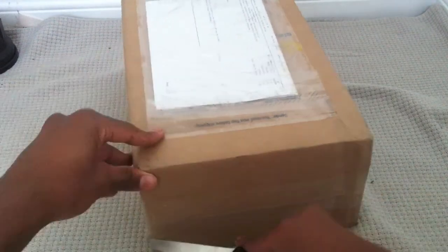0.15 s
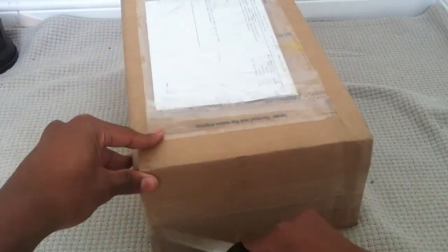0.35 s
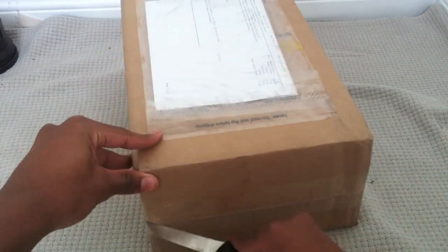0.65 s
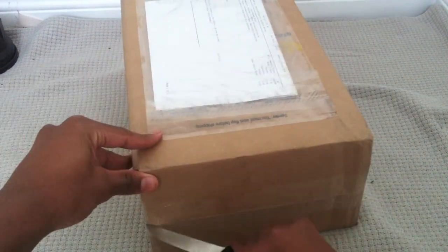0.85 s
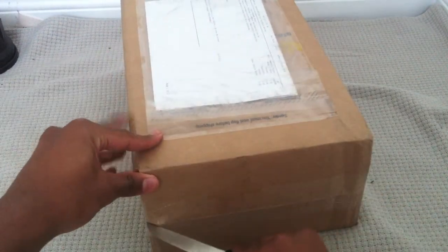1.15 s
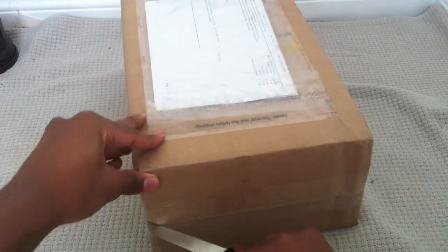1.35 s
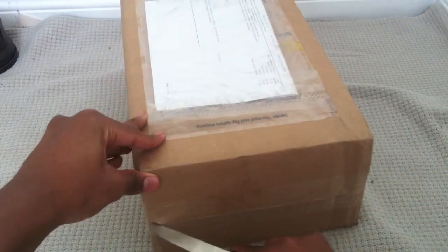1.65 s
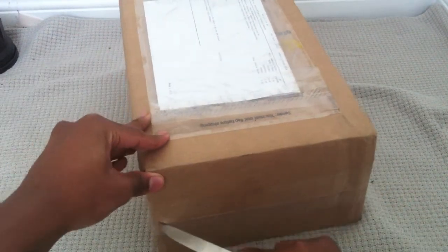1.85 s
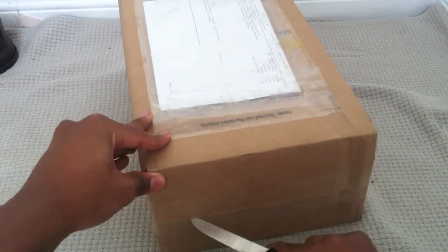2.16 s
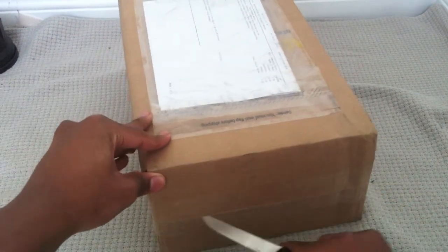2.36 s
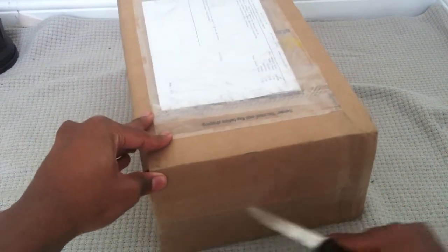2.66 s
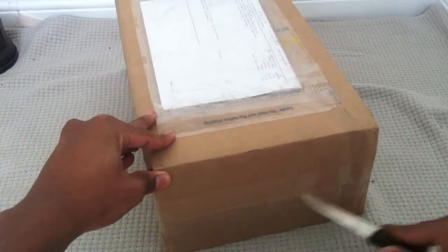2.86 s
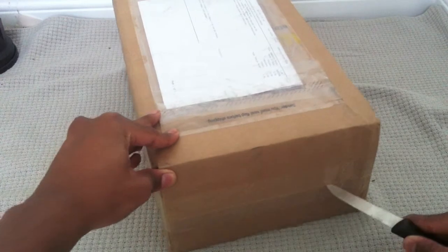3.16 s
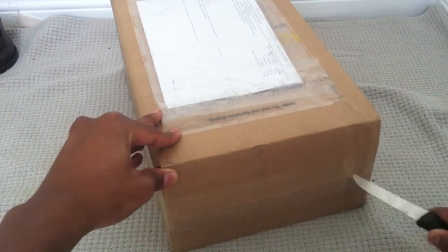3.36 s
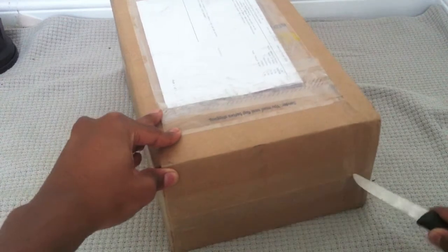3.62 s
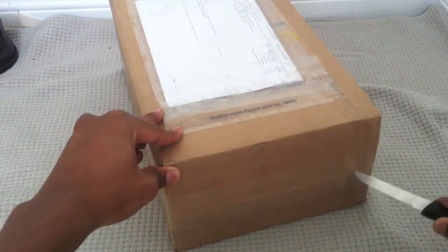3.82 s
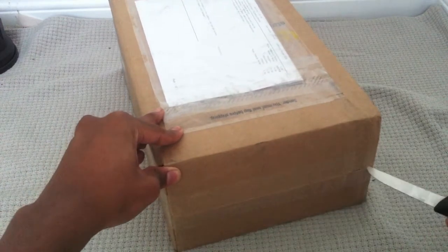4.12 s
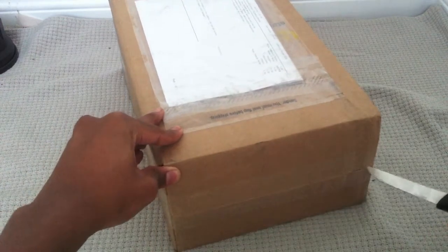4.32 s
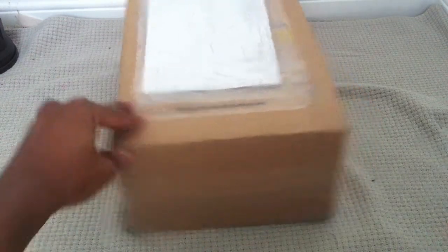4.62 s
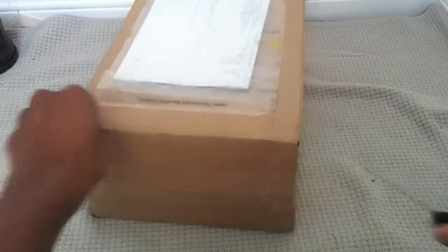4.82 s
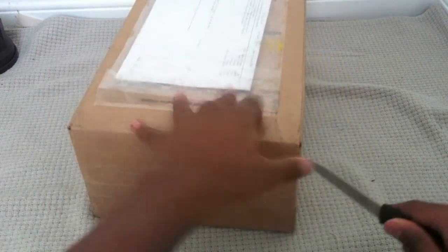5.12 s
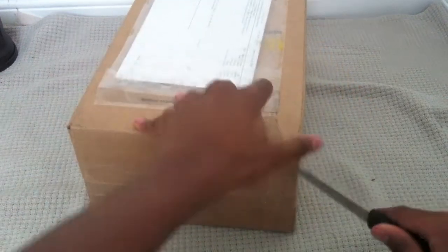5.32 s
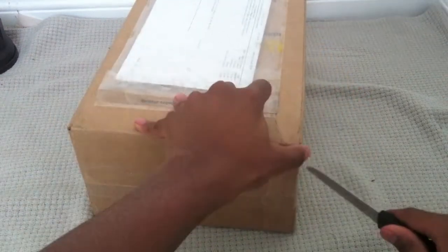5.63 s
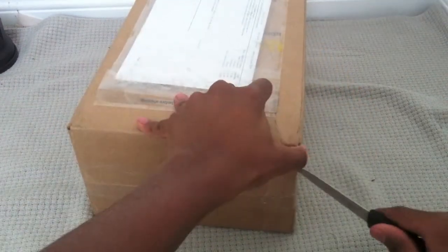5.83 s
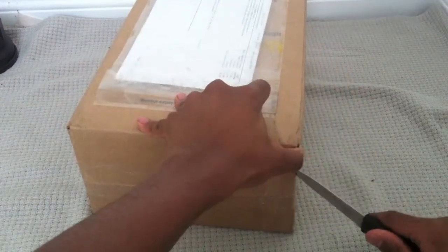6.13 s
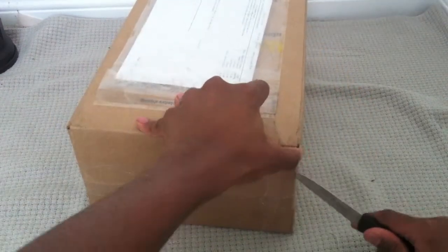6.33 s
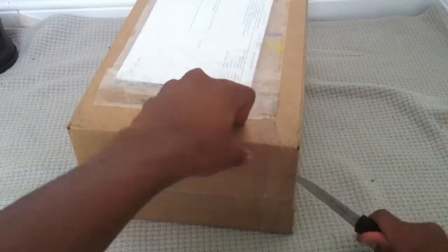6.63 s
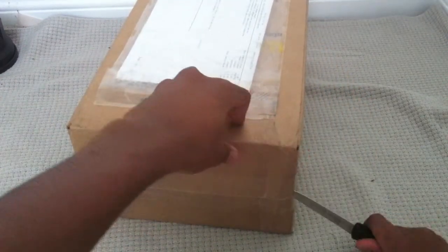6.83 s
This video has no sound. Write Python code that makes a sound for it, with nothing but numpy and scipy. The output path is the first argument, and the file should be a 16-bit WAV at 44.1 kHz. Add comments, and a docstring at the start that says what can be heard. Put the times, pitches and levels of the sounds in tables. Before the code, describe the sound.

Close and fairly dry, over faint room tone: soft skin rubs and taps, a sudden double thump, then a long gritty slit through tape that drums on the hollow box. Shorter rips follow, a steel flick with a squeak, a box dragged on a blanket, a springy blade twang, quiet handling, and a loud crunching stab with fluttering lid.

```python
"""A kitchen knife slits the packing tape of a cardboard box that stands on a blanket in a small room.
Blade: random grains rasp through tape and fibres; it catches, snaps free, squeaks, and flicks set steel modes ringing.
Box: each jolt makes a wall thump as damped swings; the panels ring as a bank of modes.
Hands: filtered noise brushes and turns the box, fingers tap, and judder on the lid as the tip stabs in."""
import sys
import numpy as np
from scipy import signal
from scipy.fft import rfft, irfft
from scipy.io import wavfile

SR = 44100
rng = np.random.default_rng(int(sys.argv[2]) if len(sys.argv) > 2 else 0)


def digitize_waveform(pressure):
    """Quantize a signal to 16-bit integers and store it at the path in sys.argv[1].

    Rows of a 2-D input are taken as channels; values are limited to [-1, 1].
    """
    field = np.atleast_2d(pressure).T
    bounded = np.clip(field, -1, 1)
    quanta = np.round(bounded * 32767).astype(np.int16)
    wavfile.write(sys.argv[1], SR, quanta)


N = 307818

# tape snapping, and ticks at any contact: f/Hz, density/dB
SNAP_SPECTRUM = [(1500, -28), (3000, -5.5), (4000, -8), (5700, -2.5), (8300, -9), (10500, -5), (12100, 4.5),
                 (14200, -6.5), (16000, -17.5)]
# board fibres giving way: f/Hz, density/dB
CRUNCH_SPECTRUM = [(40, -36.5), (120, 3), (350, 6.5), (620, 1.5), (850, 2), (1150, 2), (1550, -5),
                   (2000, -4), (2800, -6), (4000, -14.5), (9000, -48.5)]
# light friction, also the tick of the flicked blade: f/Hz, density/dB
RUB_SPECTRUM = [(100, -15), (500, 4), (1100, -3.5), (2200, -2.5), (3000, -5), (4200, -6), (5600, -2.5),
                (8000, -17), (16000, -23)]


def from_db(db):
    """Level to amplitude."""
    return 10 ** (np.asarray(db) / 20)


def rms_one(x):
    """Scale to rms 1."""
    return x / np.sqrt(np.mean(x ** 2) + 1e-20)


def seconds(size):
    """Time axis."""
    return np.arange(size) / SR


def add(track, s, sound):
    """Mix a sound into the track from time s on."""
    start = max(0, round(s * SR))
    track[start:start + len(sound)] += sound[:max(0, N - start)]


def decay(t, t60):
    """Exponential fall of 60 dB in t60."""
    return np.exp(-np.log(1000) * t / t60)


def coloured(x, spectrum):
    """Causal (minimum-phase) filter with this spectrum; white noise keeps its power."""
    size = 4096
    hz, db = np.transpose(spectrum)
    grid = np.maximum(np.arange(size // 2 + 1) * SR / size, 1)
    gain = rms_one(from_db(np.interp(np.log(grid), np.log(hz), db)))
    cepstrum = irfft(np.log(gain))
    cepstrum[1:size // 2] *= 2   # fold onto positive time
    cepstrum[size // 2 + 1:] = 0
    impulse = irfft(np.exp(rfft(cepstrum)))
    return signal.oaconvolve(x, impulse)[:len(x)]


def drift(rate):
    """Random wander about 0: unit-normal knots, rate per second, joined by lines."""
    knots = rng.standard_normal(N // 20)
    return np.interp(seconds(N) * rate, np.arange(len(knots)), knots)


def grains(per_s, spread_db):
    """Clicks of random time and sign, sizes spread exponentially in dB; rms 1."""
    sizes = from_db(spread_db * np.minimum(rng.exponential(1, N), 4))
    signs = rng.choice([-1, 1], N)
    return rms_one(sizes * signs * (rng.random(N) < per_s / SR))


def ticks(per_s, scatter_db, fall_s):
    """Short noise crackles at random moments; rms 1."""
    sizes = (rng.random(N) < per_s / SR) * from_db(scatter_db * rng.standard_normal(N))
    dying = signal.lfilter([1], [1, -np.exp(-1 / (fall_s * SR))], sizes + 1e-18)
    return rms_one(dying * rng.standard_normal(N))


def ring(force, hz, t60):
    """Resonator: a unit click sets a decaying sine of height 1 ringing."""
    r, w = np.exp(-np.log(1000) / (t60 * SR)), 2 * np.pi * hz / SR
    return signal.lfilter([0, np.sin(w)], [1, -2 * r * np.cos(w), r * r], force + 1e-18)


def ring_modes(modes):
    """Click response of a bank of modes."""
    click = signal.unit_impulse(SR // 4)
    return sum(from_db(db) * ring(click, hz, t60) for hz, db, t60 in modes)


def bursts(times, levels_db, rise_s, fall_s):
    """Envelope of short bursts, summed in power."""
    power, t = np.zeros(N), seconds(SR // 8)
    shape = (1 - np.exp(-t / rise_s)) * np.exp(-t / fall_s)
    for s, db in zip(times, levels_db):
        add(power, s, (from_db(db) * shape / shape.max()) ** 2)
    return np.sqrt(power)


def level(s, db):
    """A level curve as a gain in time, silent outside its points."""
    return from_db(np.interp(seconds(N), s, db, left=-200, right=-200))


def strokes(rows):
    """Every stroke swells to a peak and fades; one gain in time for each dB column."""
    swell_db, curve = 19, 1.86   # change over one rise or fall; 1 = pointed, 2 = rounded
    t, power = seconds(N), 0
    for peak_s, rise_s, fall_s, *levels_db in rows:
        away = np.minimum(np.maximum((peak_s - t) / rise_s, (t - peak_s) / fall_s), 4)
        shape = from_db(-swell_db * np.abs(away) ** curve)
        power = power + np.outer(from_db(levels_db), shape) ** 2
    return np.sqrt(power)


def room_tone():
    """Steady coloured noise of the room."""
    # f/Hz, density/dB
    tone_spectrum = [(15, -58), (25, -29), (76, -16), (145, -3), (335, -4), (373, -4), (427, -12.5),
                     (545, -12.5), (591, -14), (659, -16.5), (1790, -19.5), (2220, -20), (16000, -24)]
    return from_db(-63) * coloured(rng.standard_normal(N), tone_spectrum)


def sliding(rub_db, hiss_db, drag_db):
    """Fine friction of skin and blade on cardboard and of the box on the blanket."""
    # skin and blade over the box: peak t/s, rise/s, fall/s, dull rub level/dB, bright hiss level/dB (before gains)
    brush_rows = [(0.01, 0.11, 0.24, -56.5, -58), (1.195, 0.059, 0.073, -58, -53),
                  (1.42, .16, 0.11, -62.5, -62.5), (1.87, 0.39, 0.73, -64, -68.5),
                  (3.24, 0.18, .15, -61, -58), (3.6, 0.29, 0.2, -66, -58.5), (4.33, 0.13, 0.077, -71, -94),
                  (4.81, 0.41, 0.097, -52, -54), (4.885, 0.013, 0.046, -56, -52.5),
                  (5.03, 0.094, 0.055, -70.5, -50), (5.27, 0.083, 0.15, -61.5, -58.5),
                  (5.44, 0.049, 0.088, -61.5, -65.5), (6.14, 0.068, 0.068, -62.5, -70),
                  (6.29, 0.073, 0.051, -59.5, -65), (6.59, 0.16, 0.077, -62.5, -63),
                  (6.88, 0.091, 0.17, -62.5, -62)]
    # box shifting on the blanket: peak t/s, rise/s, fall/s, level/dB (before gain)
    drag_rows = [(0.01, .05, 0.19, -49), (4.8, 0.4, 0.22, -53)]
    # soft hiss of skin: f/Hz, density/dB
    hiss_spectrum = [(3000, -14.5), (7500, -7.5), (9500, -2), (12500, 1.5), (14500, -3.5), (16000, -9)]
    # box on cloth: f/Hz, density/dB
    drag_spectrum = [(29, -91), (50, -52), (93, -3), (234, 14.5), (339, 7), (462, -11), (539, -26),
                     (2000, -4), (2600, -63), (4400, -120)]
    rub, hiss = strokes(brush_rows)
    drag, = strokes(drag_rows)
    grain = grains(per_s=16000, spread_db=3.0) * from_db(0.52 * drift(rate=170))
    # skin crossing tape edges and creases
    grain += from_db(-7) * ticks(per_s=60, scatter_db=2, fall_s=0.0022)
    skin = from_db(rub_db) * coloured(rub * grain, RUB_SPECTRUM)
    skin += from_db(hiss_db) * coloured(hiss * rng.standard_normal(N), hiss_spectrum)
    cloth = coloured(drag * grains(per_s=2700, spread_db=-1.0), drag_spectrum)
    return skin + from_db(drag_db) * cloth


def judder(jitter, uneven_db, scuff):
    """Stick-slip: soft, nearly regular slips of fingers push on the lid at a wandering rate."""
    # t/s, slip rate/Hz (before jitter), level/dB
    judder_rows = [(6.63, 186, -70), (6.661, 190, -44), (6.681, 220, -44), (6.719, 210, -46),
                   (6.781, 216, -45), (6.9, 191, -45.5), (6.98, 206, -46)]
    # push of a finger: f/Hz, density/dB
    finger_spectrum = [(60, -25), (120, -3.5), (210, 2.5), (420, -3.5), (650, -8.5), (800, -18),
                       (1300, -20), (1600, -35), (4000, -40.5)]
    s, per_s, db = np.transpose(judder_rows)
    rate = np.interp(seconds(N), s, per_s) * np.exp(jitter * drift(rate=150))
    slips = np.diff(np.floor(np.cumsum(rate) / SR), prepend=0)
    slips = slips * from_db(uneven_db * drift(rate=400))
    force = rms_one(slips - slips.mean()) + scuff * rng.standard_normal(N)
    return level(s, db) * rms_one(coloured(force, finger_spectrum))


def squeaks(t60):
    """Brief rough whistles of steel gripping tape: noise through a resonator."""
    # t/s, length/s, f/Hz, level/dB
    squeak_rows = [(0.824, 0.024, 4130, -60), (4.538, 0.057, 4720, -43.5), (4.544, 0.033, 3960, -51),
                   (4.542, 0.067, 2450, -50)]
    out = np.zeros(N)
    for s, length, hz, db in squeak_rows:
        tone = rms_one(ring(rng.standard_normal(SR // 8), hz, t60))
        swell = np.hanning(round(length * SR))
        add(out, s, from_db(db) * swell * tone[:len(swell)])
    return out


def twangs(tick_fall_s, swing_delay_s):
    """The blade flicked off an edge ticks, rings and then swings as a whole."""
    # held in the board it cannot swing: t/s, swing level/dB, ring level/dB, tick level/dB
    twang_rows = [(4.443, -70, -37, -59), (4.454, -67, -32.5, -35), (5.324, -28, -32.5, -40.5),
                  (5.382, -41.5, -43, -69), (6.801, -48, -32.5, -53)]
    # steel ringing: f/Hz, level/dB, t60/s
    blade_modes = [(637, -9, 0.017), (1140, -16, 0.054), (1137, 1, 0.028), (1205, -4, 0.054),
                   (1520, -18, 0.034), (1750, -30, 0.018), (2520, -23, 0.049), (3180, -16, 0.02),
                   (4620, -18, 0.032)]
    # whole blade swinging: f/Hz, level/dB, t60/s
    swing_modes = [(288.8, -5.5, 0.23), (320.6, -1, 0.11)]
    s, swing_db, ring_db, tick_db = np.transpose(twang_rows)
    steel, swing = ring_modes(blade_modes), ring_modes(swing_modes)
    tick = bursts(s, tick_db, rise_s=0.00079, fall_s=tick_fall_s) * rng.standard_normal(N)
    out = coloured(tick, RUB_SPECTRUM)
    for at, low_db, high_db in zip(s, swing_db, ring_db):
        add(out, at, from_db(high_db) * steel)
        add(out, at + swing_delay_s, from_db(low_db) * swing)
    # a narrow blade radiates almost no bass
    return signal.sosfilt(signal.butter(2, 200, "high", fs=SR, output="sos"), out)


def jolts():
    """Catches, stabs and taps each give a snap, a crunch and a thump: t/s, then three levels/dB before gains."""
    # blade catches in the tape and snaps free: t/s, snap level/dB, thump level/dB
    catch_rows = [(2.045, -39.5, -36.5), (2.07, -37, -35), (2.089, -32.5, -14.5), (2.12, -29.5, -12.5),
                  (2.403, -34.5, -31), (2.483, -33, -25), (2.578, -45, -34.5), (2.646, -32, -29.5),
                  (2.693, -33, -22), (2.734, -39, -28), (2.768, -26.5, -18.5), (2.801, -26, -14),
                  (2.835, -24.5, -23.5), (2.869, -32, -23.5), (2.899, -27, -20), (2.929, -32, -19),
                  (2.964, -31, -21.5), (3.001, -33.5, -19.5), (3.054, -37.5, -27), (3.307, -37, -33.5),
                  (3.358, -38, -28.5), (3.384, -26.5, -28), (3.412, -40, -28), (3.93, -43, -37.5),
                  (4.004, -39.5, -31.5), (4.032, -36, -38), (4.433, -38.5, -29.5), (4.813, -44.5, -49),
                  (6.796, -22, -24.5)]
    # tip stabs into the board: t/s, crunch level/dB, thump level/dB
    stab_rows = [(0.914, -44, -40.5), (2.116, -31.5, -28), (4.456, -35, -26.5), (5.221, -44, -40),
                 (5.618, -32.5, -41.5), (6.199, -49.5, -48), (6.271, -40, -42), (6.79, -24.5, -31)]
    # fingers land on the box: t/s, thump level/dB
    tap_rows = [(0.003, -36.5), (0.922, -41.5), (1.144, -32.5), (1.185, -39.5), (1.294, -43), (1.312, -44),
                (1.369, -44), (1.594, -46), (1.72, -44.5), (4.629, -37), (5.894, -42.5), (6.12, -50),
                (6.15, -48), (6.368, -51)]
    catches = [(s, db, db - 4.5, thump_db) for s, db, thump_db in catch_rows]
    stabs = [(s, db - 2.5, db, thump_db) for s, db, thump_db in stab_rows]
    taps = [(s, db - 15, db - 15, db) for s, db in tap_rows]
    return np.transpose(catches + stabs + taps)


def thumps(gain_db, push_s, wall_t60, vary_db):
    """The released wall springs back in a few damped swings; each spot has its own pitch and overtones."""
    # multiple of the lowest mode, mean level/dB
    wall_overtones = [(1.6, -11.5), (2.35, -16.5), (3.2, -22.5)]
    wall_hz, scatter = 216.8, 0.068   # median lowest mode; log-spread from spot to spot
    out, t = np.zeros(N), seconds(SR // 4)
    swell = (1 - np.exp(-(t / push_s) ** 2)) * decay(t, wall_t60)
    multiple, overtone_db = np.transpose(wall_overtones)
    times, _, _, levels_db = jolts()
    for s, db in zip(times, levels_db):
        phase = 2 * np.pi * wall_hz * np.exp(scatter * rng.standard_normal()) * t
        gains = from_db(overtone_db + vary_db * rng.standard_normal(len(multiple)))
        wall = np.sin(phase) + gains @ np.sin(np.outer(multiple, phase))
        add(out, s, from_db(db + gain_db) * swell / swell.max() * wall)
    return out


def panels(force):
    """Modal ring of the hollow box; white noise keeps its power."""
    # other panels and the air inside: f/Hz, level/dB, t60/s
    box_modes = [(152, -5, 0.097), (201, 4.5, 0.065), (238, -1.5, 0.096), (335.2, 0.5, 0.074),
                 (393.5, -5.5, 0.073), (499, -7.5, 0.077), (599, -6.5, 0.068), (671.4, -12, 0.12),
                 (714, -9, 0.05), (798, -10.5, 0.071), (888, 1, 0.021), (1104, -23, 0.053)]
    answer = ring_modes(box_modes)
    answer *= 1 - np.exp(-seconds(len(answer)) / 0.0056)   # bending waves take a moment to spread
    return signal.oaconvolve(force, answer / np.linalg.norm(answer))[:N]


def breaking(snap_gain_db, crunch_gain_db, panel_db):
    """Each jolt gives a snap and a crunch of grains; the crunch shakes the panels."""
    s, snap_db, crunch_db, _ = jolts()
    snap = bursts(s, snap_db + snap_gain_db, rise_s=0.0077, fall_s=0.0035)
    snap *= grains(per_s=10000, spread_db=4.5)
    crunch = bursts(s, crunch_db + crunch_gain_db, rise_s=0.0012, fall_s=0.0063)
    crunch *= grains(per_s=8000, spread_db=0.5)
    cracks = coloured(snap, SNAP_SPECTRUM) + coloured(crunch, CRUNCH_SPECTRUM)
    return cracks + from_db(panel_db) * panels(crunch)


def travelling(x, patchy_db):
    """As the contact moves along the seam, each range of pitch radiates now more, now less."""
    out, rest = 0, x
    for hz in np.geomspace(450, 11000, 7):
        low = signal.sosfiltfilt(signal.butter(2, hz, fs=SR, output="sos"), rest)
        out = out + low * from_db(patchy_db * drift(rate=37))
        rest = rest - low
    return out + rest


def pushing():
    """How hard the edge works, as gains in time: on fibres and on tape."""
    # long slit along the seam: t/s, rasp level/dB, tape sizzle level/dB (before gains)
    slit_curve = [(2.21, -92, -82), (2.30, -59.5, -73), (2.42, -46.5, -55.5), (2.62, -46, -45.5),
                  (2.82, -36.5, -44.5), (3.02, -42.5, -47), (3.12, -49, -55.5), (3.18, -71, -68)]
    # short pushes: peak t/s, rise/s, fall/s, rasp level/dB, tape sizzle level/dB (before gains)
    jab_rows = [(2.086, 0.055, 0.046, -37.5, -51), (3.38, 0.091, 0.077, -37.5, -41),
                (3.935, 0.031, 0.058, -47.5, -46), (4.015, 0.07, 0.062, -45.5, -49),
                (4.445, 0.018, 0.024, -36.5, -43.5), (5.635, 0.072, 0.054, -51.5, -73),
                (6.802, 0.016, 0.048, -35, -49)]
    s, *levels_db = np.transpose(slit_curve)
    return strokes(jab_rows) + [level(s, db) for db in levels_db]


def cutting(rasp_db, sizzle_db, drum_db, uneven_db, grip_db):
    """The moving edge breaks fibres and tape in uneven clumps and snags; the fibres also drum on the box."""
    # edge in fibres: f/Hz, density/dB
    rasp_spectrum = [(60, -45), (150, -10), (380, -6.5), (650, -11.5), (1150, 0.5), (1550, -7), (2000, -5),
                     (3000, -4.5), (4000, -12), (5700, -5), (8300, -18), (16000, -11)]
    # tape crackle: f/Hz, density/dB
    sizzle_spectrum = [(4000, -15.5), (5600, -20), (7000, -16), (8800, -12.5), (10500, -10.5),
                       (12100, -4.5), (14200, -7), (16000, -29)]
    rasp, sizzle = pushing()
    bite = rms_one(from_db(uneven_db * drift(rate=250) + grip_db * drift(rate=60)))
    fibres = rasp * bite * grains(per_s=1400, spread_db=0.0)
    tape = sizzle * bite * grains(per_s=2200, spread_db=2.5)
    snags = rasp * ticks(per_s=38, scatter_db=3.5, fall_s=0.0042)
    edge = from_db(rasp_db) * coloured(fibres, rasp_spectrum)
    edge += from_db(sizzle_db) * coloured(tape, sizzle_spectrum)
    edge += from_db(-8.5) * coloured(snags, SNAP_SPECTRUM)
    edge += from_db(-3.5) * coloured(snags, CRUNCH_SPECTRUM)
    return travelling(edge, patchy_db=3.5) + from_db(drum_db) * panels(fibres)


def room(x, wet_db, t60, treble_t60, first_echo_s):
    """A small furnished room: dense reflections that die quickly, the treble first."""
    t = seconds(SR // 2)
    echoes = rng.standard_normal(len(t)) * np.clip(t / first_echo_s - 1, 0, 1)
    dull = signal.sosfilt(signal.butter(1, 4000, fs=SR, output="sos"), echoes)
    tail = dull * decay(t, t60) + (echoes - dull) * decay(t, treble_t60)
    return x + from_db(wet_db) * signal.oaconvolve(x, tail / np.linalg.norm(tail))[:N]


def scene():
    """Knife, box and blade sound in the room; hands and room tone are added dry."""
    air = room_tone()
    hands = sliding(rub_db=0.5, hiss_db=2.5, drag_db=-4.0)
    blade = twangs(tick_fall_s=0.0017, swing_delay_s=0.0034) + squeaks(t60=0.0094)
    box = thumps(gain_db=-0.5, push_s=0.0062, wall_t60=0.04, vary_db=1.5)
    box += judder(jitter=0.157, uneven_db=2.2, scuff=0.71)
    knife = breaking(snap_gain_db=-4.0, crunch_gain_db=-1.0, panel_db=-4.5)
    knife += cutting(rasp_db=-4, sizzle_db=0.5, drum_db=1.0, uneven_db=1.5, grip_db=0.5)
    wet = room(knife + box + blade, wet_db=-8.5, t60=0.16, treble_t60=0.13, first_echo_s=0.0033)
    return (wet + hands + air)[None]


def record(dry):
    """A small microphone loses the deep bass; the top is cut steeply."""
    mic_low_hz, cutoff_hz = 76.5, 16000
    thin = signal.sosfilt(signal.butter(1, mic_low_hz, "high", fs=SR, output="sos"), dry)
    return signal.sosfilt(signal.ellip(12, .1, 90, cutoff_hz, fs=SR, output="sos"), thin)


dry = scene()
out = record(dry)
digitize_waveform(out)
```